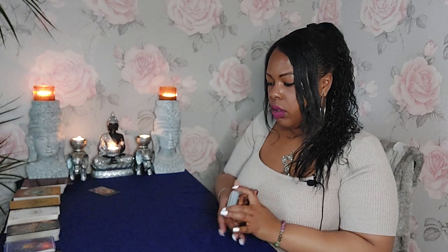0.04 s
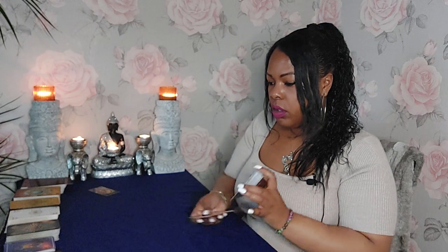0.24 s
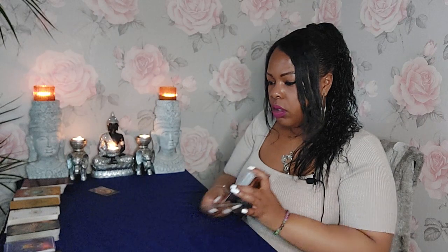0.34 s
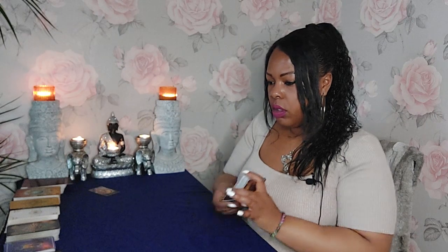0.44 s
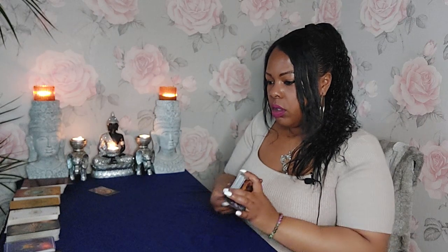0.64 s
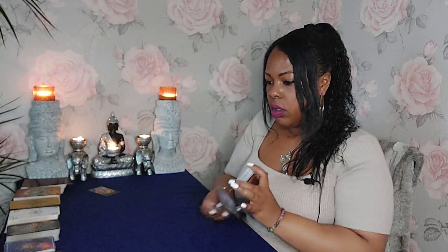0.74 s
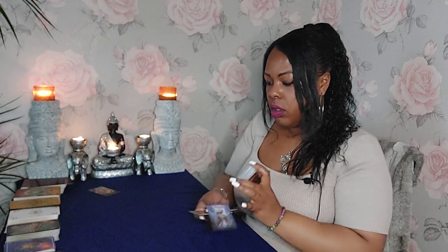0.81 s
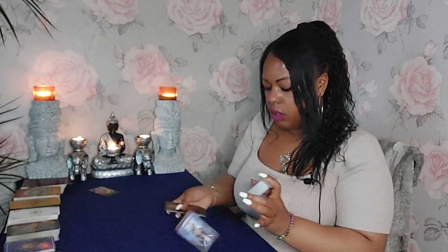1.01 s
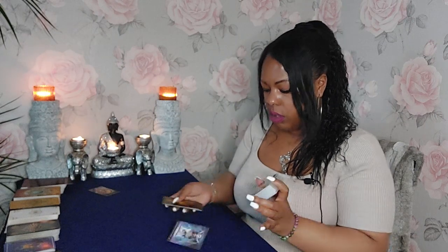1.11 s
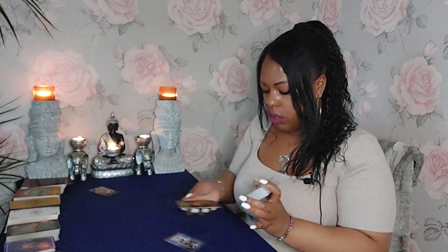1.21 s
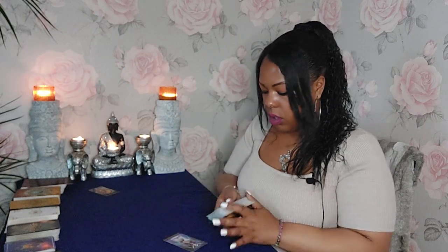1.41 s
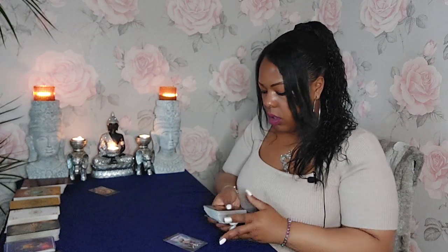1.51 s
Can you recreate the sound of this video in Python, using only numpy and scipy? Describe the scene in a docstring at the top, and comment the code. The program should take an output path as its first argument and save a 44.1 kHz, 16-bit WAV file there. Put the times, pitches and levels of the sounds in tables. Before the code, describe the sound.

Cards drawn from a hand-held deck and dealt, with crisp snaps and brief sliding hisses.

```python
"""Tarot cards are drawn from a hand-held deck and dealt onto a cloth-covered table in a small room. One
chatters loudly off the deck by stick-slip friction; edges tick and snap as impacts ring the card. Sliding faces
hiss with countless tiny slips, and dealt cards land with a soft hollow knock. A clip-on microphone close by is
bumped with low thuds and picks up the rumble of moving arms."""
import sys
import numpy as np
from scipy import signal
from scipy.io import wavfile
from scipy.ndimage import uniform_filter1d, minimum_filter1d

SR = 44100
rng = np.random.default_rng(int(sys.argv[2]) if len(sys.argv) > 2 else 0)


def int16_out(signal):
    """Quantize to a 16-bit WAV file."""
    q = np.round(np.clip(np.atleast_2d(signal).T, -1, 1) * 32767)
    wavfile.write(sys.argv[1], SR, q.astype(np.int16))


N = 68355
TIME = np.arange(N) / SR
HZ = np.fft.rfftfreq(4096, 1 / SR)

# spectrum of the steady faint hiss: frequency_hz, level_db
HISS_SPECTRUM = [(120, -31), (200, -7), (529, -13), (1320, -26.5), (7830, -28), (16000, -43)]
# envelope of the moving arms' rumble: time_s, level_db
RUMBLE_ENVELOPE = [(0, -42.5), (.09, -70), (.17, -45.5), (.3, -55.5), (.37, -56.5), (.47, -32),
                   (.55, -46.5), (.65, -60), (.79, -47.5), (.86, -47), (.96, -58.5), (1.1, -54),
                   (1.21, -61.5), (1.35, -40), (1.55, -54)]
# spectrum of that rumble: frequency_hz, level_db
RUMBLE_SPECTRUM = [(15, -15), (45, -0.5), (80, -6.5), (160, -13), (320, -30), (700, -36), (2000, -50),
                   (16000, -94.5)]
# reverberation of the room: frequency_hz, t60_s, level_db
ROOM_BANDS = [(150, 0.18, -6.5), (699, 0.52, 4), (960, 0.4, 4), (1360, 0.22, -1.5), (2483, 0.33, -0.5),
              (5000, 0.29, -2), (12030, 0.38, -5.5)]
# bumps of the clip-on microphone: start_s, level_db, rise_s, decay_s, final_pitch_hz, contact_pitch_hz
BUMPS = [(0.2184, -19, 0.00089, 0.012, 47, 177), (0.29, -35, 0.0032, 0.016, 79, 213),
         (0.478, -26, 0.0022, 0.016, 51, 225), (0.499, -19, 0.0065, 0.019, 56, 192),
         (0.762, -25.5, 0.00043, 0.00935, 69, 218), (1.001, -28.5, 0.0051, 0.012, 55.7, 172.8),
         (1.038, -40.5, 0.0072, .018, 59, 109.7), (1.265, -25.5, 0.0052, 0.018, 64.8, 134),
         (1.323, -23, 0.00044, 0.01, 49.24, 264), (1.35, -29.5, 0.0018, 0.012, 48, 150),
         (1.395, -32.5, 0.0052, 0.025, 76, 140.7), (1.467, -29, 0.0082, 0.0091, 48.4, 89.3)]
# hollow modes of a card landing: frequency_hz, level_db, t60_s
LANDING_MODES = [(232, -10.5, 0.19), (539, 4, 0.13), (672, -9, 0.17), (1032, -9, 0.2)]
# cards landing: start_s, level_db, pitch_ratio
LANDINGS = [(.886, -44, 1.5), (1.1359, -53, 1)]
# spectrum of a card's short ring: frequency_hz, level_db
CARD_SPECTRUM = [(100, -2), (250, 1.5), (450, -2), (950, -4), (1600, -1.5), (3000, -2), (4500, -6),
                 (6000, -7.5), (9500, -12), (12000, -20.5), (16000, -31)]
# card edges scraping: peak_s, level_db, rise_s, fall_s, bass_db, treble_db
SCRAPES = [(0.233, -50, 0.029, 0.015, 0, 0), (0.312, -44, 0.0066, 0.017, 19, 1),
           (0.516, -41, 0.056, 0.032, -8.5, -10), (0.579, -35.5, 0.0099, 0.019, 21, -10),
           (0.733, -32, .008, 0.017, -6.5, -12.5), (1.438, -29.5, 0.0026, 0.0025, 16, -4),
           (1.444, -35, .005, 0.012, 7.5, -7.5), (1.499, -54, 0.022, 0.017, -9, -10),
           (1.548, -52.5, 0.026, 0.015, -0.5, -19)]
# envelope of card faces sliding: time_s, level_db
SLIDE_ENVELOPE = [(0, -78), (.11, -83.5), (.16, -61), (.243, -58.5), (.26, -35), (.279, -38.5), (.292, -51),
                  (.37, -85), (.403, -69), (.43, -80), (.438, -35), (.452, -34.5), (.463, -52),
                  (.48, -47.5), (.493, -52.5), (.524, -35), (.56, -35.5), (.59, -64), (.64, -78),
                  (.68, -75.5), (.72, -43), (.76, -49), (.81, -81), (.91, -83), (1.05, -97), (1.28, -100),
                  (1.33, -75.5), (1.41, -65), (1.425, -47), (1.449, -44), (1.464, -69), (1.52, -84),
                  (1.55, -54.5)]
# spectrum of their hiss: frequency_hz, level_db
SLIDE_SPECTRUM = [(100, -41.5), (1800, -24), (4500, -7), (7500, 3), (11000, -0.5), (14000, -2.5),
                  (16000, -11.5)]
# resonance that follows the sliding card: time_s, frequency_hz
SWISH_GLIDE = [(.235, 3470), (.258, 7800), (.28, 10540), (.45, 8350), (.53, 7200), (.555, 10040),
               (.6, 5000)]
# modes of a stiff card corner: frequency_hz, level_db, t60_s
CORNER_MODES = [(1711, -4.5, 0.0077), (2850, 1, 0.0043), (3940, -4, .004), (5600, -1.5, 0.0027),
                (7770, -10, 0.0037), (9900, -7, 0.0022)]
# edges snapping free or tapping the deck:
# start_s, level_db, rattle_decay_s, pitch_hz, bass_db, treble_db, room_send_db
SNAPS = [(0.1407, -51.5, 0.0018, 3200, 15, 30, -4), (0.1512, -49.5, 0.0012, 3060, -16, 32, -19),
         (0.2887, -28.5, 0.0012, 1170, -6.5, -26, -9.5), (0.2968, -39, 0.0013, 1340, 3, -14, -9),
         (0.4717, -26, 0.0021, 2030, 5, 7, -23), (0.4768, -24.5, 0.0045, 2080, 4.5, 2.5, -9),
         (0.5360, -26, 0.0015, 1680, -6.5, 0.5, -4), (0.6839, -33, 0.00083, 1515, 10, 0, -24.5),
         (0.6941, -20, 0.00083, 3410, -4.5, -2, -7.5), (0.6992, -15, 0.0016, 2250, -6, 3, -11),
         (0.6998, -14.5, 0.0013, 3240, -4.5, -1.5, -18), (0.7624, -23, 0.0031, 1873, 4.5, -2.5, -7),
         (0.8712, -40, .0007, 1730, 10, 12.5, -14), (0.8818, -34.5, 0.0012, 1642, -7.5, 4.5, -6.5),
         (0.9037, -39, 0.0035, 3550, -3.5, -3.5, -4), (1.4221, -27.5, 0.0015, 3000, 1.5, -4.5, -14.5),
         (1.426, -24.5, 0.00025, 1264, -17, -6, -13)]
# modes of the room and table, ringing after the chatter: frequency_hz, level_db, t60_s
ROOM_TABLE_MODES = [(605, -22.5, .25), (871, -9.5, 0.17), (1660, -1, 0.11), (1909, 0, 0.1),
                    (2336, -6.5, .15), (2520, -9, .15), (3720, -7, 0.19), (3565, -10.5, .13)]
# spectrum of a bent card chattering along the deck's edge: frequency_hz, level_db
CHATTER_SPECTRUM = [(100, -20), (400, -9.5), (1150, -8), (1600, -.5), (1900, 1), (2300, -2), (3400, -3.5),
                    (4200, -7), (6000, -10.5), (10000, -21), (16000, -33)]


def amp(db):
    """Amplitude ratio of a level in decibels."""
    return 10 ** (np.asarray(db) / 20)


def unit_rms(x):
    """Power normalisation: scales a signal to an rms of one."""
    return x / np.sqrt(np.mean(x ** 2) + 1e-20)


def unit_burst(x):
    """Energy normalisation: gives a transient the energy of 5 ms at an rms of one."""
    return x / np.sqrt(np.sum(x ** 2) / (.005 * SR) + 1e-20)


def spectrum(points, hz=HZ):
    """Interpolation of a table along log frequency."""
    frequencies, values = np.transpose(points)
    return np.interp(np.log(hz + 1), np.log(frequencies + 1), values)


def envelope(points):
    """Amplitude envelope, interpolated in decibels."""
    return amp(np.interp(TIME, *np.transpose(points)))


def add(mix, start_s, sound):
    """Superposition: sums a sound into the mix from its start time."""
    part = mix[max(round(start_s * SR), 0):][:len(sound)]
    part += sound[:len(part)]


def colour(x, gain_db):
    """Minimum-phase filtering: the Hilbert transform of the log gain gives a causal response."""
    log_gain = np.log(amp(np.concatenate([gain_db, gain_db[-2:0:-1]])))
    response = np.exp(np.conj(signal.hilbert(log_gain)))
    taps = np.fft.ifft(response).real
    return signal.fftconvolve(x, taps[:len(taps) // 2])[:len(x)]


def resonate(x, centre_hz, width_hz):
    """Heterodyne resonance: shifts a moving centre frequency to zero, low-passes and shifts back."""
    carrier = np.exp(2j * np.pi * np.cumsum(centre_hz) / SR)
    pole = np.exp(-np.pi * width_hz / SR)
    return (carrier * signal.lfilter([(1 - pole) ** 2], [1, -2 * pole, pole * pole], x / carrier)).real


def ring(modes, t):
    """Free vibration: a sum of exponentially damped modes."""
    return sum(amp(db - 60 * t / t60) * np.sin(2 * np.pi * hz * t) for hz, db, t60 in modes)


def background():
    """Filtered noise: the rumble of moving arms swells and fades over a faint steady hiss."""
    rumble = unit_rms(colour(rng.standard_normal(N), spectrum(RUMBLE_SPECTRUM)))
    hiss = unit_rms(colour(rng.standard_normal(N), spectrum(HISS_SPECTRUM)))
    return envelope(RUMBLE_ENVELOPE) * rumble + amp(-74.5) * hiss


def room(send, gap_s=.00067, early_db=12, early_s=.01):
    """Reverberation: scattered reflections, strongest at first, decay at each band's own rate."""
    t, bands = TIME[:SR * 2 // 3], np.array(ROOM_BANDS)
    reflections = rng.standard_normal(len(t)) * (rng.random(len(t)) < .15)
    reflections *= amp(early_db * np.exp(-t / early_s))
    hz, frame_s, frames = signal.stft(reflections, SR, nperseg=256)
    t60_s = spectrum(bands[:, :2], hz)[:, None]
    tail = signal.istft(frames * amp(-60 * frame_s / t60_s), SR, nperseg=256)[1][:len(t)]
    tail *= t > gap_s
    coloured = colour(send, spectrum(bands[:, ::2]))
    return signal.fftconvolve(coloured, tail / np.linalg.norm(tail))[:N]


def mic_bumps(glide_s=.0039):
    """Damped oscillation: each bump of the clip-on microphone is a low swing whose pitch drops after contact."""
    out, t = np.zeros(N), TIME[:SR // 4]
    for start_s, db, rise_s, decay_s, final_hz, contact_hz in BUMPS:
        cycles = np.cumsum(final_hz + (contact_hz - final_hz) * np.exp(-t / glide_s)) / SR
        attack = np.sin(np.pi / 2 * np.minimum(t / rise_s, 1))
        decay = np.exp(-np.maximum(t - rise_s, 0) / decay_s)
        add(out, start_s, amp(db) * attack * decay * np.sin(2 * np.pi * cycles))
    return out


def card_landings(puff_decay_s=.019, puff_cutoff_hz=1100):
    """Impact excitation: a falling card rings hollow modes, with a dull puff of noise."""
    out, t = np.zeros(N), TIME[:SR // 4]
    lowpass_db = -12 * np.log2(1 + (HZ / puff_cutoff_hz) ** 2)
    for start_s, db, pitch_ratio in LANDINGS:
        noise = rng.standard_normal(len(t)) * np.exp(-t / puff_decay_s)
        puff = unit_burst(colour(noise, lowpass_db))
        add(out, start_s, amp(db) * (ring(LANDING_MODES, pitch_ratio * t) + 1.33 * puff))
    return out


def card_response(bass_db, treble_db, bass_hz=900, treble_hz=5000):
    """Frequency response of a card in decibels, with a shelf at each end."""
    bass_shelf = bass_db / (1 + (HZ / bass_hz) ** 2)
    treble_shelf = treble_db * HZ ** 2 / (HZ ** 2 + treble_hz ** 2)
    return spectrum(CARD_SPECTRUM) + bass_shelf + treble_shelf


def friction(slips_per_s=2500, spread_db=3):
    """Shot noise of friction: tiny slips of uneven size occur at random instants."""
    slipping = rng.random(N) < slips_per_s / SR
    sizes = amp(spread_db * np.minimum(rng.exponential(1, N), 4))
    return unit_rms(slipping * sizes * rng.choice([-1, 1], N))


def edge_scrapes():
    """Frictional excitation: a briefly dragged edge drives the card, duller than a sliding face."""
    out = np.zeros(N)
    for peak_s, db, rise_s, fall_s, bass_db, treble_db in SCRAPES:
        t = TIME - peak_s
        shape = np.exp(-(np.minimum(t, 0) / rise_s) ** 2 - np.maximum(t, 0) / fall_s)
        out += amp(db) * shape * unit_rms(colour(friction(), card_response(bass_db, treble_db)))
    return out


def face_slides(swish_db=-1, rub_db=-50, rub_exponent=.45):
    """Sliding friction: card faces hiss with a gliding resonance, over a duller rub that varies less."""
    gain = envelope(SLIDE_ENVELOPE)
    hiss = unit_rms(colour(friction(), spectrum(SLIDE_SPECTRUM)))
    swish_hz = np.interp(TIME, *np.transpose(SWISH_GLIDE))
    swish = unit_rms(resonate(friction(), swish_hz, width_hz=1700))
    rub = unit_rms(colour(friction(), card_response(bass_db=-9.5, treble_db=-.5)))
    rub_gain = amp(rub_db) * (gain / gain.max()) ** rub_exponent
    return gain * unit_rms(hiss + amp(swish_db) * swish) + rub_gain * rub


def corner_click(start_s=.4348, level_db=-14.5, low_hz=1220, top_hz=11100):
    """Radiation from a small source: a stiff corner clicks off the deck, too small to emit bass."""
    out = np.zeros(N)
    band_db = -12 / (1 + (HZ / low_hz) ** 6) - 20 * np.log10(1 + (HZ / top_hz) ** 6)
    click = colour(ring(CORNER_MODES, TIME[:len(HZ)]), band_db)
    add(out, start_s, amp(level_db) * unit_burst(click))
    return out


def edge_snaps(rattle_share=.73, peak_db=7, peak_octaves=.14):
    """Impulse response: a sharp tick and a brief rattle ring the card. Returns sound and room send."""
    direct, send, t = np.zeros(N), np.zeros(N), TIME[:len(HZ)]
    tick = unit_burst(1. * (t == 0))
    for start_s, db, decay_s, pitch_hz, bass_db, treble_db, send_db in SNAPS:
        rattle = unit_burst(rng.standard_normal(len(t)) * np.exp(-t / decay_s))
        drive = (1 - rattle_share) * tick + rattle_share * rattle
        resonance_db = peak_db * np.exp(-.5 * (np.log2((HZ + 1) / pitch_hz) / peak_octaves) ** 2)
        snap = amp(db) * unit_burst(colour(drive, card_response(bass_db, treble_db) + resonance_db))
        add(direct, start_s, snap)
        add(send, start_s, amp(send_db) * snap)
    return direct, send


def card_chatter(start_s=.7035, length_s=.0074, level_db=-6, swell_db=6, ring_db=-19.5, send_db=-8.5):
    """Stick-slip: a bent card chatters along the deck, and the room and table ring on after it."""
    out, t = np.zeros(N), TIME[:SR // 4]
    first_per_s, final_per_s, slowing_s = 3200, 1830, .002
    slips_per_s = final_per_s + (first_per_s - final_per_s) * np.exp(-t / slowing_s)
    jitter = .12 * unit_rms(uniform_filter1d(rng.standard_normal(len(t)), size=20))
    slip_count = np.floor(np.cumsum(slips_per_s * (1 + jitter)) / SR)
    grit = .2 * rng.standard_normal(len(t))
    slips = np.diff(slip_count, prepend=0) + grit
    progress = np.minimum(t / length_s, 1)
    drive = (slips - slips.mean()) * (t < length_s) * amp(swell_db * progress)
    add(out, start_s, amp(level_db) * unit_burst(colour(drive, spectrum(CHATTER_SPECTRUM))))
    send = amp(send_db) * out  # only the slips feed the reverberation
    add(out, start_s, amp(ring_db) * progress * ring(ROOM_TABLE_MODES, t))
    return out, send


def scene():
    """Direct and reverberant fields add: cards and hands near the microphone, the room behind."""
    snaps, snap_send = edge_snaps()
    chatter, chatter_send = card_chatter()
    rubbing = face_slides() + edge_scrapes()
    corner = corner_click()
    reverb = room(snap_send + chatter_send + amp(-17.5) * rubbing + amp(-14) * corner)
    cards = card_landings() + rubbing + corner + snaps + chatter
    return (background() + reverb + mic_bumps() + cards)[None]


def record(dry, ceiling=.97, cutoff_hz=16200):
    """Peak and band limiting: the gain dips briefly at the loudest peaks, then a low-pass follows."""
    safe_gain = np.minimum(1, ceiling / (abs(dry[0]) + 1e-9))
    smooth_gain = uniform_filter1d(minimum_filter1d(safe_gain, size=45), size=45)  # 1 ms windows
    lowpass = signal.firwin(255, cutoff_hz, window=("kaiser", 9), fs=SR)
    return signal.oaconvolve(dry * smooth_gain, lowpass[None], "same")


dry = scene()
out = record(dry)
int16_out(out)
```